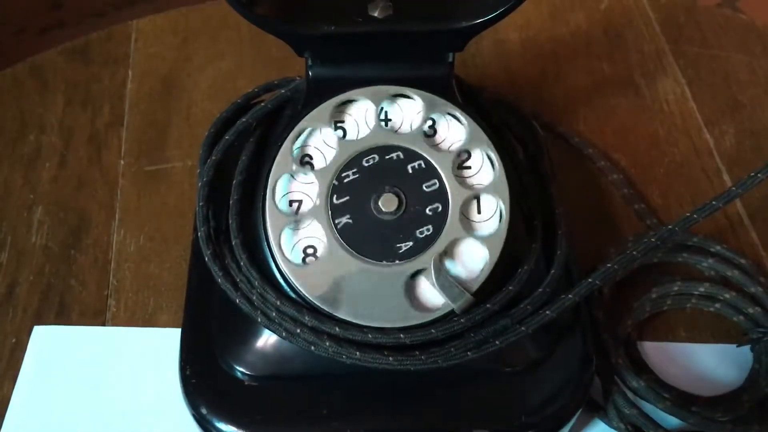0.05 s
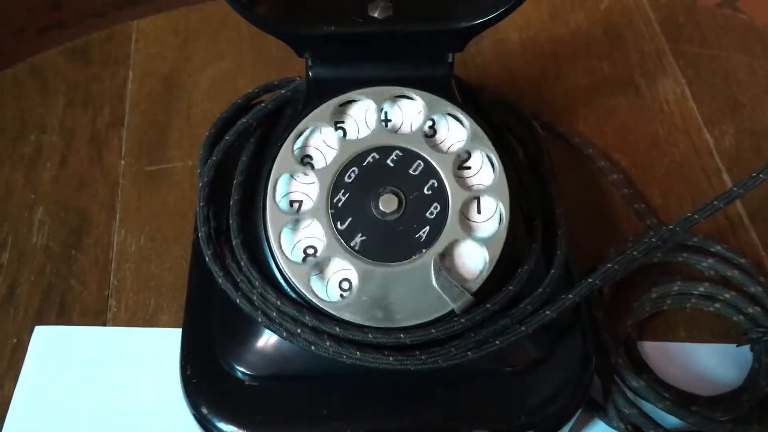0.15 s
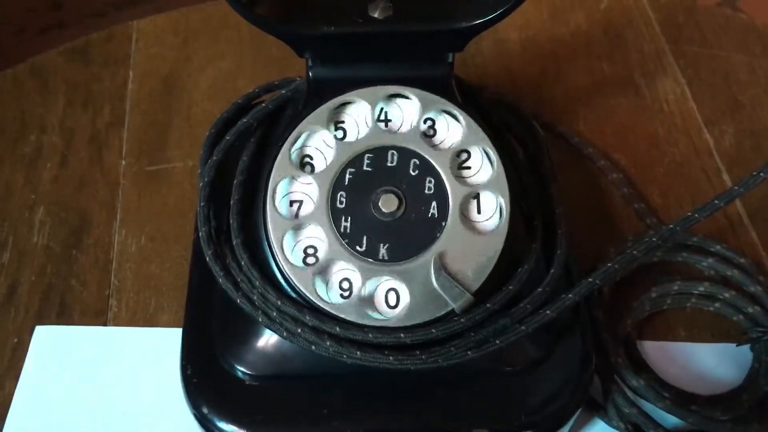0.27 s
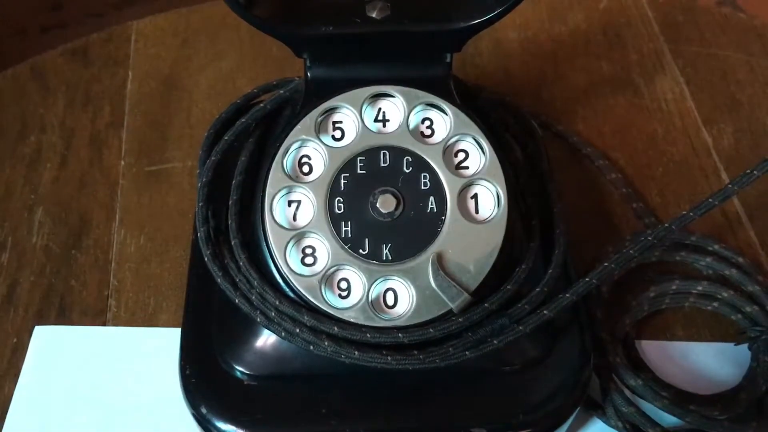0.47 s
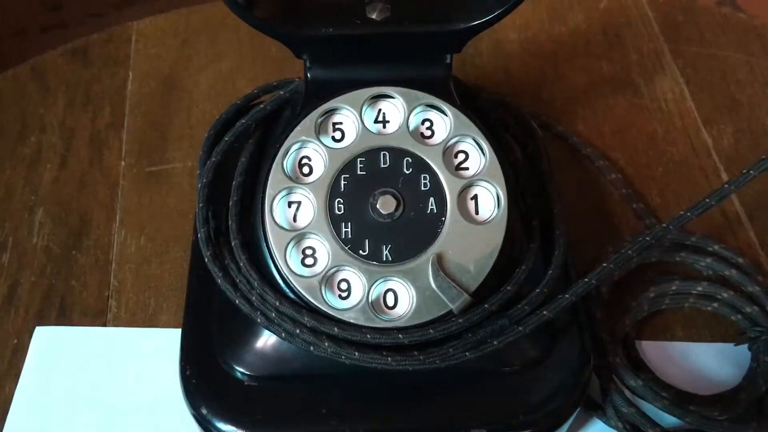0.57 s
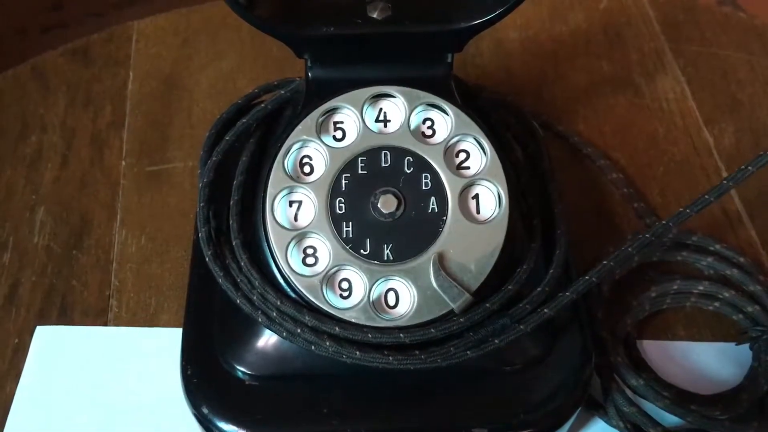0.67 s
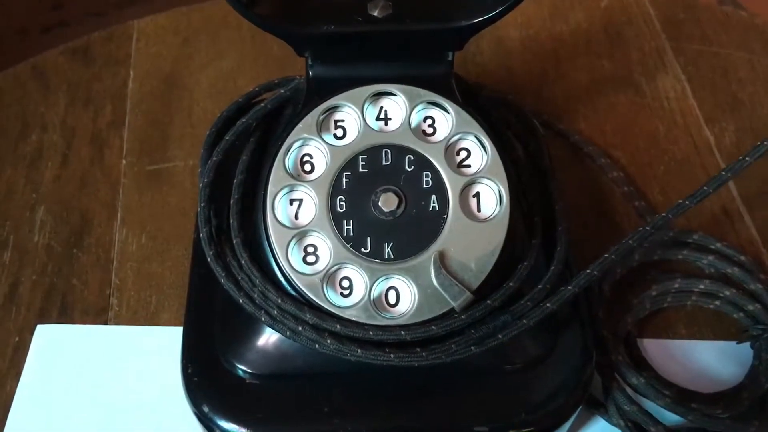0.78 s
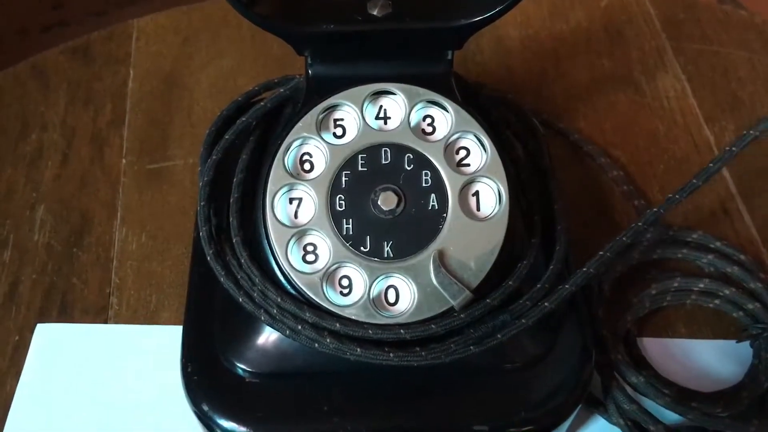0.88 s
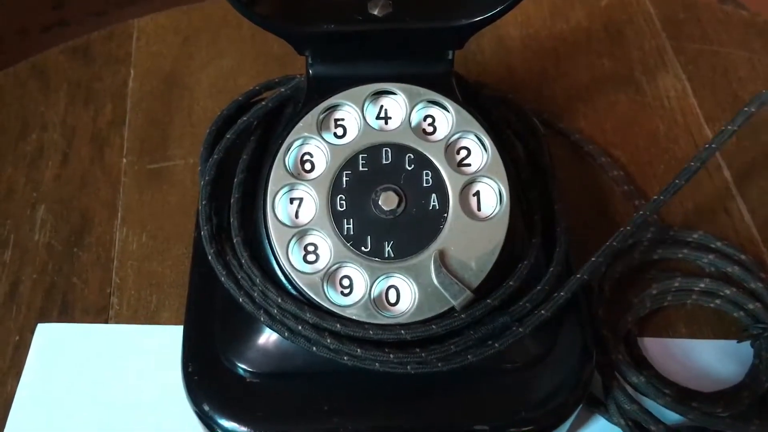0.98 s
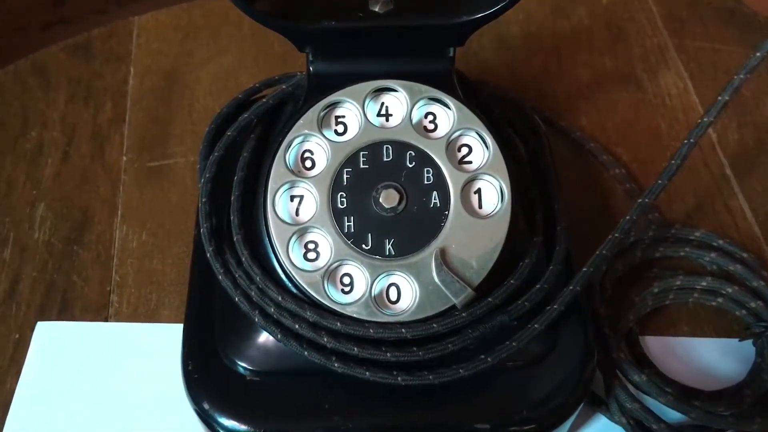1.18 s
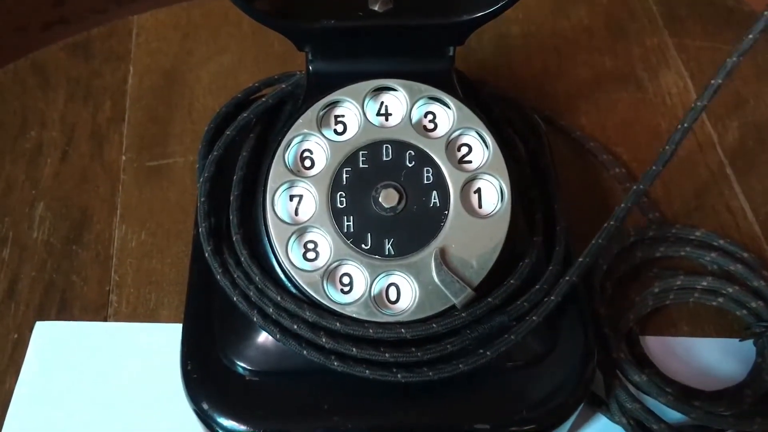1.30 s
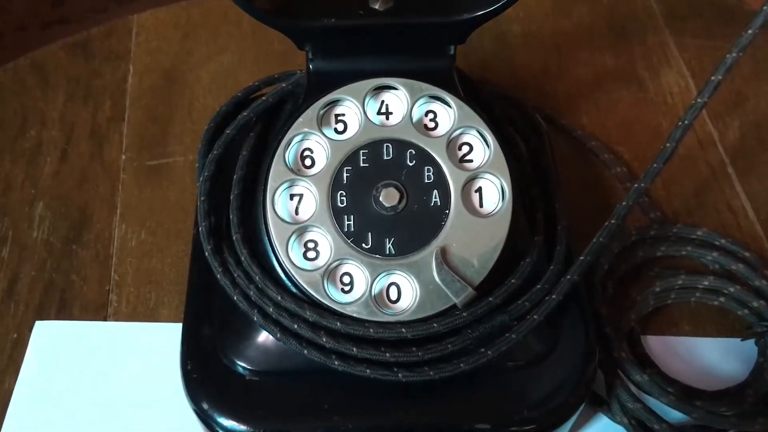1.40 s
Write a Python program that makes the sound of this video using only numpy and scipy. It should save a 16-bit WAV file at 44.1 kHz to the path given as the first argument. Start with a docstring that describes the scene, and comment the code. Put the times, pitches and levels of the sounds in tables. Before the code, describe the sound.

A rotary telephone dial whirrs and clicks home, ending in one hard clack against its stop

```python
"""A rotary phone dial runs home on a wooden table: the governor whirrs while pulse contacts, as plucked and
struck resonators, snap open and shut ten times a second. The dial then hits its stop: modes of case and frame
knock, the table thumps and metal parts ring faintly. Sparse decaying reflections form the room.
Room air (coloured noise) and a low engine-like hum (sine partials) run throughout; later come faint thin
whistles (gated tones) and a swell like passing traffic (noise under an envelope)."""
import sys
import numpy as np
from scipy import signal
from scipy.fft import rfft, irfft
from scipy.io import wavfile

SR = 44100
rng = np.random.default_rng(int(sys.argv[2]) if len(sys.argv) > 2 else 0)


def to_wav(s):
    """Save 16-bit WAV."""
    ch = np.atleast_2d(s).T  # columns
    pcm = np.round(np.clip(ch, -1, 1) * 32767)  # PCM
    wavfile.write(sys.argv[1], SR, pcm.astype(np.int16))


def ratio(d):
    """dB to gain"""
    e = np.asarray(d, float) / 20
    return 10 ** e


N = 63945
STOP_S = 0.2195


def evened(x):
    """Scales x to rms 1."""
    return x / np.sqrt(np.mean(x ** 2) + 1e-20)


def read(points, hz):
    """Interpolates a (hz, value) table along log frequency."""
    f, value = np.transpose(points)
    return np.interp(np.log(hz + 1), np.log(f + 1), value)


def coloured(x, points):
    """Filters x by the (hz, db) curve, then scales it to rms 1."""
    gain = ratio(read(points, np.fft.rfftfreq(len(x), 1 / SR)))
    return evened(irfft(rfft(x) * gain, len(x)))


def slow(rate_hz):
    """Random wander of rms 1: sines up to rate_hz, the slower ones stronger."""
    t = np.arange(N) / SR
    wander = np.zeros(N)
    for f in np.geomspace(rate_hz / 10, rate_hz, 20):
        wander += np.sin(2 * np.pi * (f * t + rng.random())) / np.sqrt(f)
    return evened(wander)


def rings(modes, seconds):
    """Response of an object to one sharp tap: decaying sine modes (hz, db, t60_s)."""
    t = np.arange(round(seconds * SR)) / SR
    return sum(ratio(db - 60 * t / t60_s) * np.sin(2 * np.pi * hz * t) for hz, db, t60_s in modes)


def crack(points, db, t60_s, seconds):
    """Many small modes blurred into a quickly dying burst of coloured noise."""
    t = np.arange(round(seconds * SR)) / SR
    return ratio(db - 60 * t / t60_s) * coloured(rng.standard_normal(len(t)), points)


def add(force, s, db, contact_s, share):
    """Adds one blow: a sharp first touch, then a share of chatter that swells and dies."""
    u = np.arange(600) / SR / max(contact_s, 1e-5)
    chatter = rng.standard_normal(600) * u * np.exp(-2 * u)
    chatter *= share / np.linalg.norm(chatter)
    chatter[0] += 1 - share
    part = force[round(max(s, 0) * SR):][:600]
    part += ratio(db) * chatter[:len(part)]


def contacts():
    """The pulse contact snaps open with a spring twang and falls shut with a duller tap; faint ticks."""
    # contact snapping open: start_s, level_db
    opens = [(0.0, -24), (0.1036, -22.5), (0.2117, -29)]
    # contact falling shut: start_s, level_db
    shuts = [(0.024, -29), (0.1284, -29.5)]
    # cam and settling parts: start_s, level_db
    ticks = [(0.089, -38), (.1945, -70), (1.168, -55.5)]
    # contact spring plucked on opening: mode_hz, level_db, t60_s
    spring_modes = [(1443, -25, 0.036), (2148, -20, 0.051), (2676, -32, 0.031), (3450, -20, 0.034),
                    (5163, -20.5, 0.029), (5950, 3.5, 0.013), (6315, -10.5, 0.033), (6770, -10, 0.0093),
                    (7515, -8, 0.0105), (8791, -43, .03), (11510, -13.5, 0.0097), (13800, -5.5, 0.011)]
    # case answering the spring: mode_hz, level_db, t60_s
    case_answer = [(668, 1.4, .08), (480, -26, .03)]
    # contact struck on closing: mode_hz, level_db, t60_s
    anvil_modes = [(820, -1, .05), (1642, -13, .04), (2345, -3.5, 0.033), (6239, -21.5, .03),
                   (7500, -9, .008), (8800, -2, .008)]
    # contact's blurred small modes: freq_hz, density_db_per_hz
    contact_crack = [(800, -31.5), (2500, -7), (4800, -10), (7000, 7), (9500, -15), (14000, -11.5),
                     (16000, -38)]
    # tick colour: freq_hz, density_db_per_hz
    tick_colour = [(2000, -2), (6000, -13.5), (10500, -5), (13000, -4.5), (16000, -13)]
    open_thump_db, open_crack_db, shut_crack_db = -9, -2, 0
    crack_t60_s, response_s = 0.027, 0.1

    pluck, tap, tick = np.zeros((3, N))
    for s, db in opens:
        add(pluck, s, db, contact_s=0.0014, share=0.5)
    for s, db in shuts:
        add(tap, s, db, contact_s=0.002, share=0.85)
    for s, db in ticks:
        add(tick, s, db, contact_s=0.002, share=0.8)

    twang = rings(spring_modes, response_s)
    twang += ratio(open_thump_db) * rings(case_answer, response_s)
    twang += crack(contact_crack, open_crack_db, crack_t60_s, response_s)
    anvil = rings(anvil_modes, response_s)
    anvil += crack(contact_crack, shut_crack_db, crack_t60_s, response_s)
    tick_burst = crack(tick_colour, 0, 0.015, response_s)
    pairs = (pluck, twang), (tap, anvil), (tick, tick_burst)
    return sum(signal.fftconvolve(force, response) for force, response in pairs)[:N]


def knocks():
    """Blows at the stop excite the modes of the hollow case and metal frame, which radiate lows poorly."""
    # blows: start_s, case_db, frame_db, contact_s
    blows = [(0.208, -34, -38, 0.00189), (0.2179, -42, -25.5, .0008), (0.2194, -32.5, -11.5, 0.00031),
             (0.2211, -13.5, -29.5, 0.00027), (0.2344, -44, -44, 0.0011), (0.2952, -47, -44, 0.0015)]
    # hollow case: mode_hz, level_db, t60_s
    case_modes = [(295, -19.5, 0.14), (433.2, -7.5, 0.09), (503.7, -5, .07), (612, -14, 0.041),
                  (628, 1, .06), (675, -1.5, .05), (859, 3, 0.057), (971, -5.5, 0.091), (1170, -42, 0.013),
                  (1696, -9, .04)]
    # metal frame: mode_hz, level_db, t60_s
    frame_modes = [(2166, -8, 0.061), (2466, -8.5, .04), (2916, -1.5, 0.02), (3205, 5, .012),
                   (3690, 4.5, 0.013), (4440, -8, 0.018), (5190, -7, .02), (6190, -4, 0.0091),
                   (6770, -8, 0.016), (7000, -5.5, 0.013), (11540, -14.5, 0.053)]
    radiates_above_hz, response_s = 272, 0.3

    case, frame = np.zeros((2, N))
    for s, case_db, frame_db, contact_s in blows:
        add(case, s, case_db, contact_s, share=0.12)
        add(frame, s, frame_db, contact_s, share=0.27)
    metal = rings(frame_modes, response_s) + crack(FRAME_CRACK, 9.5, 0.007, response_s)
    struck = signal.fftconvolve(case, rings(case_modes, response_s))
    struck += signal.fftconvolve(frame, metal)
    highpass = signal.butter(2, radiates_above_hz, "high", fs=SR)
    return signal.lfilter(*highpass, struck)[:N]


# frame's blurred small modes: freq_hz, density_db_per_hz
FRAME_CRACK = [(800, -24), (1400, -14), (2000, -2), (3800, 3), (4900, -6), (6500, -1), (7600, -10),
               (10500, -14), (14000, -13), (15000, -26), (16000, -44)]


def stop_aftermath():
    """From STOP_S the table thumps with a slow rise, loose parts rattle and metal rings long."""
    # metal parts: mode_hz, level_db, t60_s
    ring_modes = [(1545, -60, 1.5), (2110, -46, .55), (2170, -47, 1.5), (3106, -54, .3), (3445, -50, .11),
                  (3930, -58, .45), (7364, -59, 1.5), (8253, -56, .3), (13330, -53, .25), (13480, -52, .14)]
    # table top: mode_hz, level_db, t60_s
    table_modes = [(120, -45, .2), (162, -36.5, .25), (199, -32.5, 0.17), (236, -45, .15)]
    table_rise_s, rattle_db, rattle_t60_s = 0.0073, -25.5, 0.086

    out = np.zeros(N)
    at = round(STOP_S * SR)
    left_s = (N - at) / SR
    t = np.arange(N - at) / SR
    thump = rings(table_modes, left_s) * (1 - np.exp(-(t / table_rise_s) ** 2))
    rattle = crack(FRAME_CRACK, rattle_db, rattle_t60_s, left_s)
    out[at:] = rings(ring_modes, left_s) + thump + rattle
    return out


def whirr():
    """Dense random gear-tooth impulses over the governor's sagging drone until the dial stops."""
    # gear rattle colour: freq_hz, density_db_per_hz
    gear_colour = [(290, -20), (500, -35), (780, -6.5), (1100, -24), (1490, -9), (2160, -19.5),
                   (2600, -10.5), (3500, -21), (4770, -24), (6100, -18), (7200, -26), (8200, -31.5),
                   (15500, -40)]
    gears_db, teeth_per_s, tooth_spread_db = -50.5, 14000, 1.2
    start_hz, sag_hz_per_s, wander_rms_hz, drone_db = 480, 65, 2, -50.5
    run_down_s = 0.012

    t = np.arange(N) / SR
    teeth = ratio(tooth_spread_db * rng.exponential(1, N)) * rng.standard_normal(N)
    teeth *= rng.random(N) < teeth_per_s / SR
    rattle = ratio(gears_db + 1.2 * slow(60)) * coloured(teeth, gear_colour)
    pitch_hz = start_hz + wander_rms_hz * slow(17) - sag_hz_per_s * t
    drone = np.sqrt(2) * np.sin(2 * np.pi * np.cumsum(pitch_hz) / SR)
    drone *= ratio(drone_db + 2.4 * slow(40))
    return (rattle + drone) * np.clip((STOP_S - t) / run_down_s, 0, 1)


def wall_clack():
    """The clack as the walls receive it, its resonances blurred over all directions."""
    # clack colour: freq_hz, density_db_per_hz
    clack_colour = [(150, -19), (350, 0.5), (700, 4.5), (1000, 0.5), (1300, -7), (2200, -3), (3900, -7.5),
                    (4900, -30), (6000, -3), (7200, -21.5), (8000, -11), (14200, -34), (15500, -51)]
    clack = coloured(np.arange(N) == round(STOP_S * SR), clack_colour)
    return ratio(17.5) * clack / np.linalg.norm(clack)


def room(x):
    """Sparse reflections of random sign, each band dying at its own speed."""
    # room decay: freq_hz, t60_s
    room_decay = [(150, 0.9), (400, 0.35), (800, 0.42), (2000, 0.38), (4000, 0.45), (6500, 0.37),
                  (9000, 0.13), (14000, 0.43)]
    room_db = -21

    taps = np.zeros(SR // 2)
    at = np.arange(130, len(taps) - 10, 10)  # samples
    taps[at + rng.integers(0, 10, len(at))] = rng.choice([-1., 1.], len(at))
    hz, t, z = signal.stft(taps, SR, nperseg=256)
    decay = ratio(-60 * t / read(room_decay, hz)[:, None])
    tail = signal.istft(z * decay, SR, nperseg=256)[1]
    return ratio(room_db) * signal.fftconvolve(x, tail / np.linalg.norm(tail))[:N]


def traffic():
    """A swell like passing traffic: coloured noise under a level envelope."""
    # swell envelope: time_s, level_db
    pass_envelope = [(.9, -84), (.99, -57), (1.1, -48.5), (1.2, -48.5), (1.3, -52.5), (1.45, -68)]
    # swell colour: freq_hz, density_db_per_hz
    traffic_colour = [(60, -3), (110, -1.5), (220, 3), (300, -17), (600, -23), (1200, -15), (2500, -19),
                      (3500, -23), (6000, -55.5)]
    t = np.arange(N) / SR
    envelope = ratio(np.interp(t, *np.transpose(pass_envelope)))
    return envelope * coloured(rng.standard_normal(N), traffic_colour)


def whistles():
    """Faint thin tones of steady pitch that come and go, their level fluttering a little."""
    # whistles: start_s, length_s, level_db, pitch_hz
    whistle_notes = [(.6, .08, -65, 2880), (.7, .05, -63, 2880), (.81, .04, -69, 2880),
                     (.88, .08, -66, 2878), (.9, .08, -69, 2215), (1.04, .19, -62, 2214),
                     (1.135, .1, -69, 2745), (1.31, .065, -62, 2217)]
    fade_s = 0.0051
    t = np.arange(N) / SR
    out = np.zeros(N)
    for s, length_s, db, hz in whistle_notes:
        tone = np.sqrt(2) * ratio(db + 1.6 * slow(39.7)) * np.sin(2 * np.pi * hz * t)
        out += tone * np.clip(np.minimum(t - s, s + length_s - t) / fade_s, 0, 1)
    return out


def hum():
    """Low engine-like hum: harmonics share a wandering pitch, each wavers in level."""
    # hum partials: harmonic_order, rms_db
    hum_partials = [(2, -51), (4, -69.5), (5, -58.5)]
    base_hz, waver_rms_db = 39.23, 0.9
    turns = np.cumsum(base_hz * (1 + 0.004 * slow(4))) / SR
    out = np.zeros(N)
    for order, db in hum_partials:
        level = np.sqrt(2) * ratio(db + waver_rms_db * slow(13))
        out += level * np.sin(2 * np.pi * (order * turns + rng.random()))
    return out


def air():
    """Room air: coloured noise with a slight slow level wander."""
    # air colour: freq_hz, density_db_per_hz
    air_colour = [(30, -28.5), (50, -8.5), (62, 1.5), (110, -11), (230, -18), (300, -26), (600, -28.5),
                  (800, -26.5), (1000, -22.5), (2000, -22), (3200, -28), (4500, -33), (8000, -40),
                  (15000, -43.5), (16400, -51)]
    return ratio(-54.5 + 0.6 * slow(2)) * coloured(rng.standard_normal(N), air_colour)


def scene():
    """Phone, its reflections and the background, as one channel."""
    phone = contacts() + knocks() + stop_aftermath() + whirr()
    walls = room(phone + wall_clack())
    background = traffic() + hum() + air()
    return (phone + walls + whistles() + background)[None]


def top_cut(x):
    """Nothing passes above the cut-off."""
    return signal.sosfilt(signal.butter(12, 16600, fs=SR, output="sos"), x)


def record(dry):
    """Linear-phase low-pass band limit, then the final stage."""
    edge_hz = 16500
    lowpass = signal.firwin(511, edge_hz, window=("kaiser", 9), fs=SR)
    mix = signal.oaconvolve(dry, lowpass[None], "same")
    return top_cut(mix)


dry = scene()
out = record(dry)
to_wav(out)
```